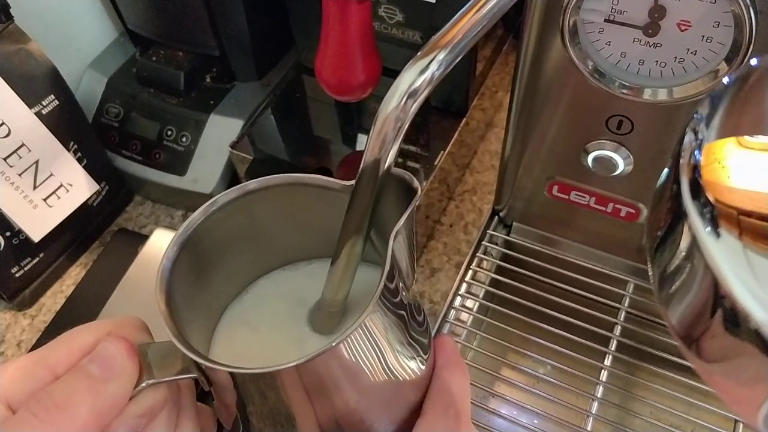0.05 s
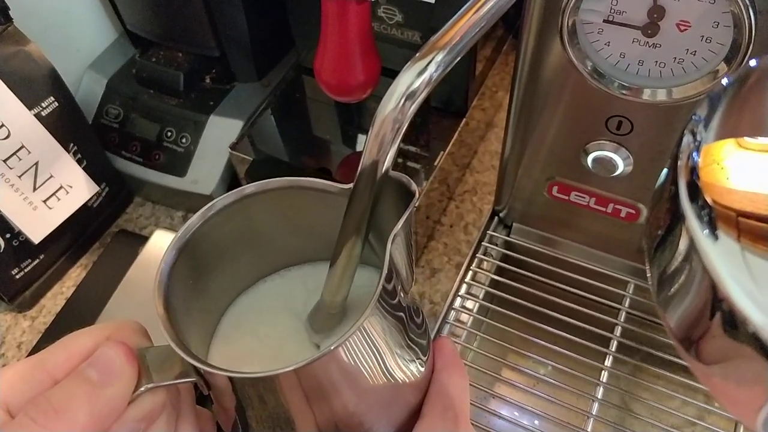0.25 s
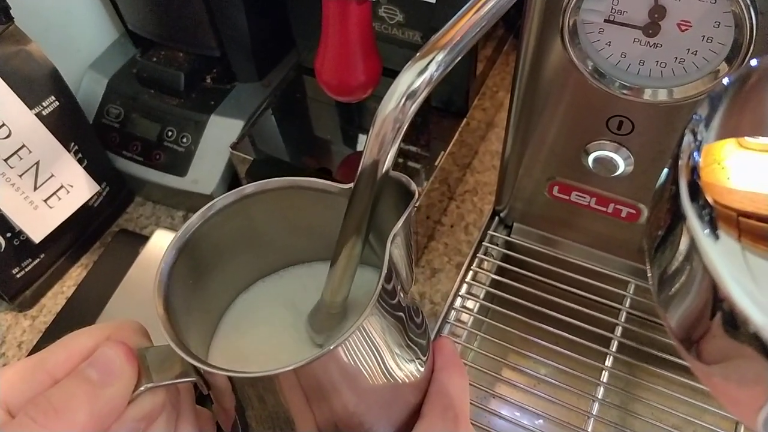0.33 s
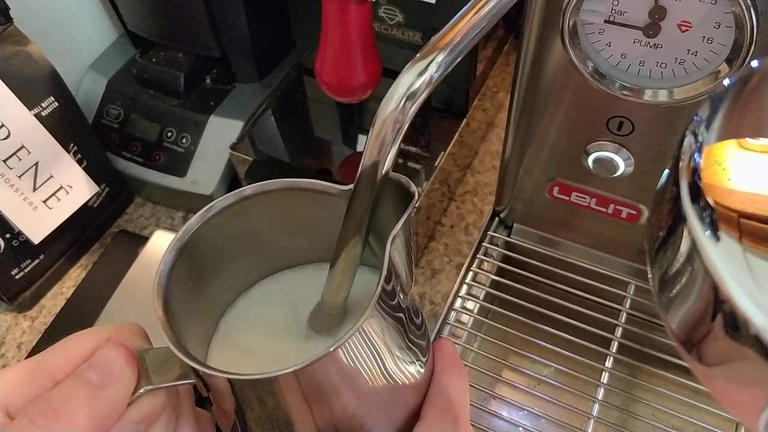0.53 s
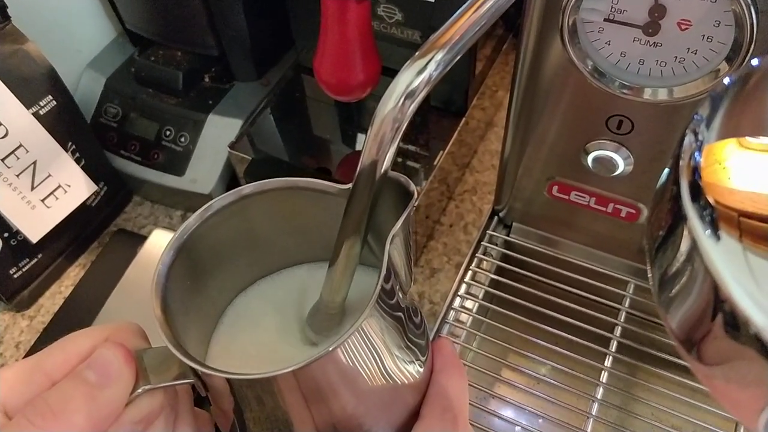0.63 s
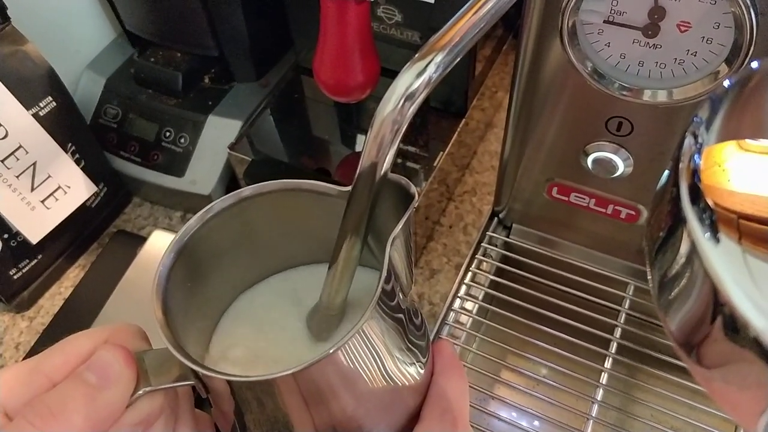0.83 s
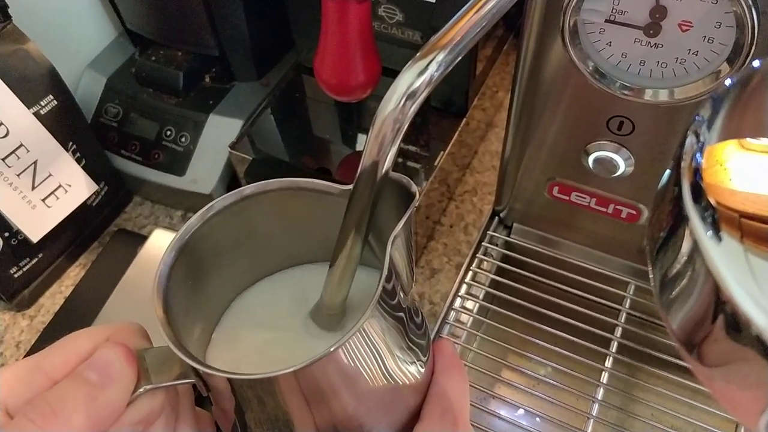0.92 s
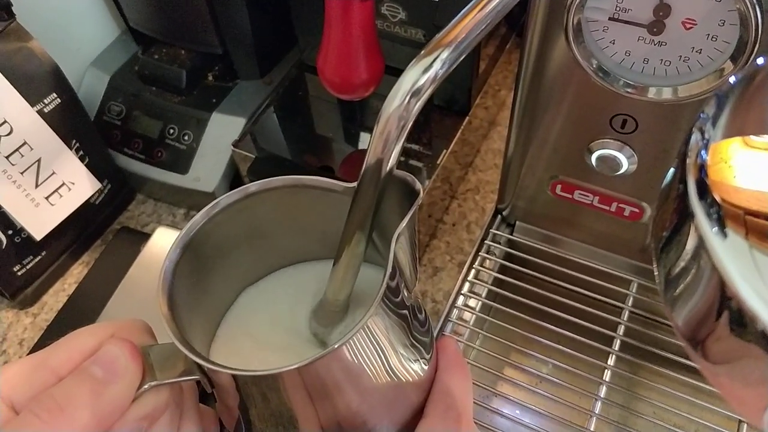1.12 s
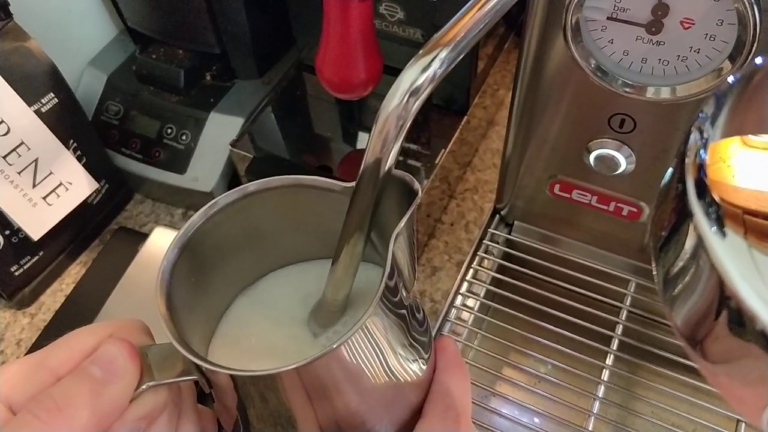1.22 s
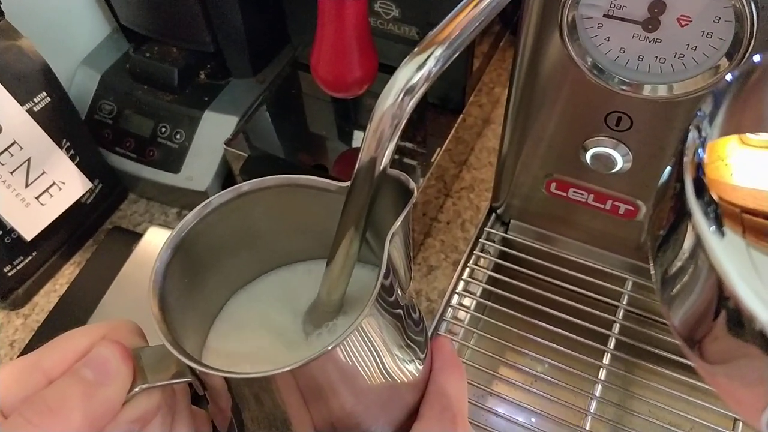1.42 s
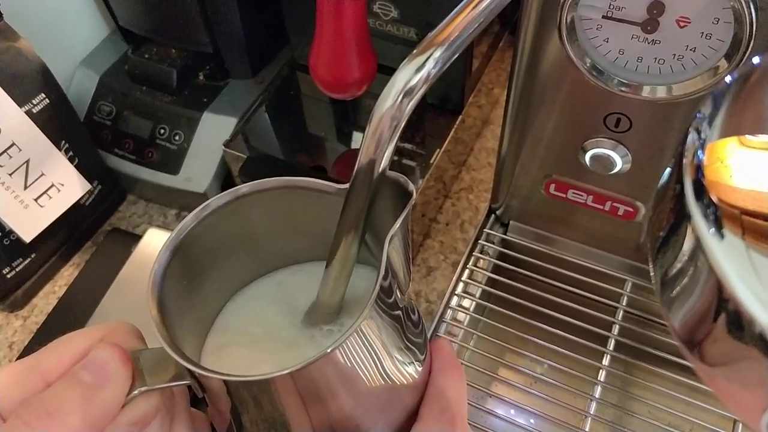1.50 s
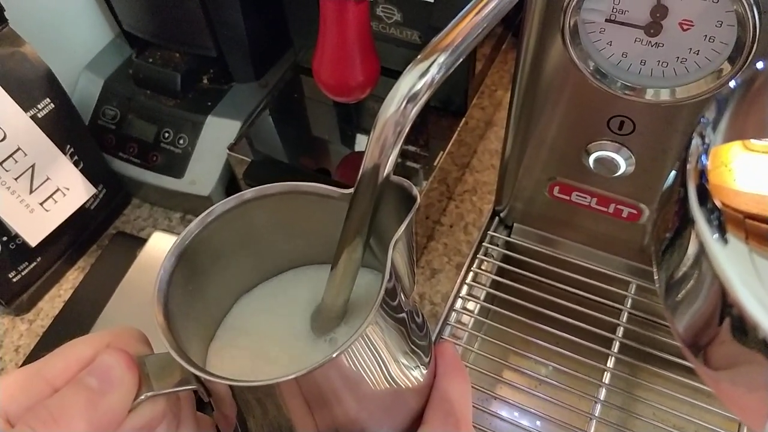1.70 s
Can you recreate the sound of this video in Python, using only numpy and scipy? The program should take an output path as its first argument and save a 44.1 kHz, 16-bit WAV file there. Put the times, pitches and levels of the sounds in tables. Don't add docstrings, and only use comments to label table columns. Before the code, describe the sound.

A steam wand froths milk in a metal pitcher, heard close in a small kitchen over faint low hum. Soft hiss opens; spits and piercing chirps break out at 0.2-0.4 s. The loudest ragged tearing, with ringing pings, comes at 0.55-0.75 s. Quieter churn follows until 1.0 s, then choppy chirps, hollow gulps and spits until 1.45 s, easing into bubbly hiss. Treble is slightly dulled.

```python
import sys
import numpy as np
from scipy import signal
from scipy.fft import rfft, irfft
from scipy.io import wavfile

SR = 44100
rng = np.random.default_rng(int(sys.argv[2]) if len(sys.argv) > 2 else 0)


def dump(signal):
    limited = np.clip(np.atleast_2d(signal).T, -1, 1)
    pcm = np.round(limited * 32767).astype(np.int16)
    wavfile.write(sys.argv[1], SR, pcm)


def amplitude_ratio(level_db):
    exponent = np.asarray(level_db, float) / 20
    return 10 ** exponent


N = 77175


def rms_one(x):
    return x / np.sqrt(np.mean(x ** 2) + 1e-20)


def drift(rate_hz):
    r = np.exp(-2 * np.pi * rate_hz / SR)
    noise = rng.standard_normal(N + SR)
    return rms_one(signal.lfilter([1], [1, -2 * r, r * r], noise)[SR:])


def coloured(points):
    hz, db = np.transpose(points)
    grid_hz = np.arange(N // 2 + 1) * SR / N + 1
    gain = amplitude_ratio(np.interp(np.log(grid_hz), np.log(hz), db))
    return rms_one(irfft(rfft(rng.standard_normal(N)) * gain, N))


def time_from(start_s):
    return np.arange(N)[:, None] / SR - start_s


def power_sum(shapes):
    return np.sqrt(np.sum(shapes ** 2, axis=1))


def blips(t, db, length_s):
    rise_share = 0.25
    rise = np.minimum(t, 0) / (rise_share * length_s)
    fall = np.maximum(t, 0) / ((1 - rise_share) * length_s)
    return amplitude_ratio(db - 3.47 * rise ** 2 - 11.3 * fall ** 0.69)


# frequency in Hz, width in Hz, level in dB.
PITCHER = [(1010, 149, 7), (1133, 102, 1), (1801, 69, 3.5), (2487, 227, -0.5), (2828, 84, 1),
           (3383, 53, 1.5), (3712, 56, 6), (4274, 70, 6.5), (4460, 140, 8.5), (4790, 160, 9.5),
           (5468, 150, 12), (5374, 68, 4.5), (6804, 250, 5.5), (7300, 380, 8.5)]


def pitcher(x, shift_db=0):
    direct_db, foam_rate_hz = -4, 21.5
    out = amplitude_ratio(direct_db) * x
    for hz, width_hz, db in PITCHER:
        r = np.exp(-np.pi * width_hz / SR)
        poles = [1, -2 * r * np.cos(2 * np.pi * hz / SR), r * r]
        fed = x * amplitude_ratio(shift_db * drift(foam_rate_hz)) if shift_db else x
        out = out + amplitude_ratio(db) * (1 - r * r) / 2 * signal.lfilter([1, 0, -1], poles, fed)
    return out


def sounding(colour, envelope, shift_db=0):
    noise = coloured(colour)
    return pitcher(noise * envelope, shift_db) / np.std(pitcher(noise))


# frequency in Hz, level in dB rms.
HUM = [(58, -55.5), (53.7, -73.5)]
# frequency in Hz, level in dB.
RUMBLE = [(20, -7.5), (80, -11), (130, -9.5), (200, -19), (700, -59)]


def machine():
    waver_db, rumble_db = 1.5, -58.5
    t = np.arange(N) / SR
    out = amplitude_ratio(rumble_db) * coloured([*RUMBLE, (900, -84.0)])
    for hz, db in HUM:
        out = out + np.sqrt(2) * amplitude_ratio(db + waver_db * drift(3)) * np.sin(2 * np.pi * hz * t)
    return out


# time in seconds, hiss level in dB, milk churn level in dB.
JET = [(0, -43, -55), (.15, -44, -69), (.3, -41.5, -62), (.52, -43.5, -66.5), (.8, -42, -61),
       (0.932, -47, -48), (1.03, -50, -49.5), (1.12, -42.5, -39), (1.25, -47, -41), (1.328, -38, -41),
       (1.44, -47.5, -39.5), (1.55, -44, -44), (1.619, -45.5, -51.5), (1.75, -55.5, -45.5)]
# frequency in Hz, level in dB per Hz.
JET_COLOUR = [(300, -13.5), (1000, -6), (2000, -11), (3000, -1.5), (4500, -2.5), (5500, -1.5), (7000, -9.5),
              (8300, -29)]
CHURN_COLOUR = [(300, -11.5), (1000, -5.5), (1900, -15.5), (2800, -5), (3800, -8.5), (5000, -14),
                (8000, -38.5)]
# frequency in Hz, level in dB.
GURGLE_COLOUR = [(60, -12.5), (130, 1), (200, -6), (500, -3.5), (900, -27)]


def jet():
    hiss_trim_db, hiss_patchy_db = -1, 1.8
    churn_trim_db, churn_patchy_db, foam_shift_db = -2, 2.0, 3.5
    crackles_per_s, crackle_db = 620, -5.5
    gurgle_db, gurgle_follows, gurgle_lumpy_db = -60, 0.4, 1.2
    s, hiss_db, churn_db = np.transpose(JET)
    t = np.arange(N) / SR
    stir_db = np.interp(t, s, churn_db)

    hiss = amplitude_ratio(np.interp(t, s, hiss_db) + hiss_trim_db + hiss_patchy_db * drift(30))
    churn = amplitude_ratio(stir_db + churn_trim_db + churn_patchy_db * drift(57))

    size_db = 5 * np.minimum(rng.exponential(1, N), 4)
    clicks = (rng.random(N) < crackles_per_s / SR) * amplitude_ratio(size_db)
    crackle = rms_one(signal.lfilter([1], [1, -.97], clicks))
    churn = churn * (1 + amplitude_ratio(crackle_db) * crackle)

    follow_db = gurgle_follows * (stir_db - stir_db.mean())
    gurgle = amplitude_ratio(gurgle_db + follow_db + gurgle_lumpy_db * drift(27)) * coloured(GURGLE_COLOUR)
    heard_hiss = sounding(JET_COLOUR, hiss, foam_shift_db / 2)
    return heard_hiss + sounding(CHURN_COLOUR, churn, foam_shift_db) + gurgle


def bursts(s, db, hold_s):
    attack_s, t60_s = 0.0076, 0.081
    t = time_from(s) + attack_s / 2
    dying_s = np.clip(t - attack_s - hold_s, 0, 1)
    return power_sum(np.clip(t / attack_s, 0, 1) ** 2 * amplitude_ratio(db - 60 * dying_s / t60_s))


# start in seconds, level in dB, hold in seconds, brightness in dB.
TEARS = [(0.112, -36.5, 0.0054, -13), (0.626, -35, .005, 0), (0.205, -35.5, 0.014, -34),
         (0.238, -26, 0.011, -1.5), (0.251, -39, 0.0032, 5), (0.293, -44.5, .015, -27),
         (0.319, -29.5, 0.012, 2.5), (0.355, -35, 0.01, -2.5), (0.374, -31.5, 0.013, -1.5),
         (0.395, -32, 0.01, 0.5), (0.151, -37, 0.015, -30), (0.557, -30, 0.035, 1.5),
         (0.636, -19, 0.049, -5), (0.666, -18.5, 0.0096, -9), (0.69, -21, 0.011, -1.5),
         (0.705, -17, 0.012, -2.5), (0.725, -26.5, 0.021, -3.5), (0.803, -51.5, 0.0069, -0.5),
         (1.044, -44.5, 0.0059, 10.5), (1.097, -29.5, 0.02, 9), (1.132, -46, 0.0084, 15),
         (1.147, -27.5, 0.0068, 7), (1.167, -35.5, 0.019, 1.5), (1.262, -36.5, 0.0081, -29.5),
         (1.279, -30, 0.0025, -35.5), (1.376, -24.5, 0.0046, 4), (1.402, -24.5, 0.0038, -5),
         (1.42, -34.5, 0.014, 1), (1.487, -43, 0.0022, -30.5), (1.524, -55, 0.01, -21.5)]
# frequency in Hz, level in dB per Hz.
TEAR_COLOUR = [(100, -10.5), (500, -16.5), (1000, -10), (2000, -21), (3000, -8), (5000, -6), (7400, -10.5),
               (8400, -16.5)]


def tears():
    bright_hz, trim_db, spit_db = 6450, -2, 0.5
    s, db, hold_s, bright_db = np.transpose(TEARS)
    spit = amplitude_ratio(trim_db + spit_db * drift(130))
    noise = coloured(TEAR_COLOUR)
    body = signal.sosfilt(signal.butter(4, bright_hz, "low", fs=SR, output="sos"), noise)
    top = signal.sosfilt(signal.butter(4, bright_hz, "high", fs=SR, output="sos"), noise)
    drive = body * bursts(s, db, hold_s) + top * bursts(s, db + bright_db, hold_s)
    return pitcher(drive * spit) / np.std(pitcher(noise))


# peak in seconds, level in dB, length in seconds, pitch in Hz.
GULPS = [(0.24, -33, 0.0033, 1020), (0.262, -39, 0.014, 1042), (0.325, -31.5, 0.01, 1027),
         (0.402, -39, 0.01, 937), (0.585, -42.5, 0.037, 997), (0.646, -29, 0.0098, 1040),
         (0.661, -25, 0.0091, 1022), (0.717, -49, 0.0059, 990), (0.731, -30, 0.011, 983),
         (0.9, -42.5, 0.021, 1010), (0.933, -38.5, 0.0074, 1010), (0.983, -41, 0.0051, 810),
         (1.056, -37, 0.008, 980), (1.109, -36.5, 0.022, 1060), (1.124, -33, 0.004, 1062),
         (1.148, -34.5, 0.0048, 1080), (1.175, -38, 0.0086, 1023), (1.195, -30, 0.0076, 1010),
         (1.281, -25.5, 0.0053, 1003), (1.286, -33, 0.0035, 1010), (1.308, -37.5, 0.0042, 1010),
         (1.335, -27, 0.0073, 1005), (1.368, -38, 0.042, 1089), (1.387, -44.5, 0.011, 1025),
         (1.456, -31.5, 0.0073, 995), (1.531, -32.5, 0.0067, 1042), (1.604, -39, 0.015, 1088),
         (1.678, -41, 0.0096, 1018), (1.654, -43.5, 0.03, 1005), (1.723, -45, 0.035, 1010),
         (0.85, -50.5, 0.046, 1030), (0.954, -42.5, 0.014, 1053), (1.437, -38.5, 0.018, 1010)]
# frequency in Hz, level in dB per Hz.
GULP_COLOUR = [(300, -5.5), (600, -22), (1050, -7.5), (1500, -7), (4000, -58.5)]


def gulps():
    trim_db, rise_hz_per_s, froth_db = 1.5, 2000, -8
    s, db, length_s, hz = np.transpose(GULPS)
    t = time_from(s)
    shapes = blips(t, db + trim_db, length_s)
    cycles = t * (hz + rise_hz_per_s * t / 2)
    tones = np.sqrt(2) * np.sum(shapes * np.sin(2 * np.pi * cycles), axis=1)
    return tones + sounding(GULP_COLOUR, amplitude_ratio(froth_db) * power_sum(shapes))


# peak in seconds, level in dB, length in seconds.
CHIRPS = [(0.246, -30, .012), (0.262, -24, .009), (0.326, -18, 0.0071), (0.333, -21, 0.0078),
          (0.362, -31.5, 0.017), (0.384, -29, 0.024), (0.409, -33, 0.011), (0.463, -36.5, 0.014),
          (0.567, -33.5, 0.008), (0.584, -29.5, 0.032), (0.667, -16, 0.016), (0.684, -30, 0.0072),
          (.718, -18.5, .012), (1.053, -30.5, 0.0086), (1.097, -30, 0.005), (1.104, -27.5, 0.024),
          (1.113, -28, 0.007), (1.135, -23, 0.0031), (1.152, -20, 0.0087), (1.158, -22, 0.005),
          (1.192, -36, 0.011), (1.332, -32.5, 0.0052), (1.388, -33.5, 0.0077), (1.408, -38, 0.0093)]


def chirps():
    s, db, length_s = np.transpose(CHIRPS)
    level = power_sum(blips(time_from(s), db, length_s))
    hz = 5454 + 95 * drift(250)
    return np.sqrt(2) * level * np.sin(2 * np.pi * np.cumsum(hz) / SR)


# peak in seconds, level in dB, length in seconds, pitch in Hz.
HEAVES = [(.25, -41, 0.011, 285), (.251, -39.5, 0.012, 591), (0.333, -48.5, 0.02, 270),
          (.594, -46.5, 0.014, 280), (.584, -45, 0.014, 580), (0.59, -49, 0.049, 540),
          (0.68, -38.5, 0.014, 265), (.705, -39.5, 0.017, 260), (.678, -43, 0.015, 440),
          (.725, -46, .02, 440), (0.75, -37.5, 0.018, 870), (0.67, -38, 0.024, 970), (0.9, -41, .006, 200),
          (.984, -42.5, .003, 670), (1.297, -43.5, .03, 127), (1.6, -47.5, 0.017, 180),
          (1.338, -44, 0.0082, 540), (3.2, -49, 0.016, 560), (.255, -51, 0.057, 125),
          (0.719, -45, 0.061, 115.7), (.997, -44.5, 0.0308, 130), (1.2, -51, 0.016, 120),
          (1.4, -48.5, 0.027, 118), (1.055, -45.5, 0.022, 200), (1.61, -42, 0.022, 115),
          (1.73, -48.5, 0.05, 100)]


def heaves():
    s, db, length_s, hz = np.transpose(HEAVES)
    t = time_from(s)
    return np.sqrt(2) * np.sum(blips(t, db, length_s) * np.sin(2 * np.pi * hz * t), axis=1)


# peak in seconds, level in dB, length in seconds, pitch in Hz.
POPS = [(0.651, -32, .01, 4850), (0.672, -18.5, .008, 4900), (0.694, -16.5, .005, 4900),
        (0.7, -17, .006, 4270), (.713, -15.5, 0.014, 4840), (.786, -30, .005, 4800),
        (.573, -36, 0.034, 7480), (1.114, -31.5, 0.014, 7450), (1.156, -31, .008, 7300),
        (.252, -30, .012, 7030), (.395, -32, .025, 7060), (1.177, -37, .006, 4750),
        (1.23, -37.5, 0.044, 3330), (1.236, -35, 0.0055, 4140), (1.25, -30.5, .007, 4270),
        (1.254, -33, 0.0085, 2820), (1.268, -34.5, 0.0091, 2785), (1.291, -26.5, .005, 4710),
        (1.308, -34, 0.0059, 4730), (1.325, -42, 0.013, 2850), (1.336, -35, 0.0068, 3700),
        (1.381, -31, 0.0055, 4350), (1.382, -34.5, 0.0075, 2790), (1.378, -36, 0.004, 7250),
        (1.408, -33, 0.0039, 4460), (1.435, -30.5, 0.017, 7000), (1.443, -39, 0.0089, 2860),
        (1.476, -45, 0.017, 2775), (1.485, -36.5, 0.0067, 4800), (1.495, -32, 0.0049, 4380),
        (1.534, -37, 0.011, 4670), (1.545, -41, 0.013, 4340), (1.557, -40.5, 0.0072, 4500),
        (1.595, -43, 0.011, 4460), (1.616, -43, 0.013, 4230), (1.651, -43.5, .012, 4280),
        (1.686, -47, .012, 4180)]


def pops():
    wander_hz = 160
    s, db, length_s, hz = np.transpose(POPS)
    t = time_from(s)
    wander_cycles = np.cumsum(wander_hz * drift(250))[:, None] / SR
    tones = np.sin(2 * np.pi * (hz * t + wander_cycles))
    return np.sqrt(2) * np.sum(blips(t, db, length_s) * tones, axis=1)


def kitchen(x):
    t60_s, onset_s, level_db = 0.36, 0.0086, -16
    t = np.arange(SR // 2) / SR
    tail = rng.standard_normal(len(t)) * amplitude_ratio(-60 * t / t60_s) * np.clip(t / onset_s, 0, 1)
    tail = tail / np.sqrt(np.sum(tail ** 2))
    return amplitude_ratio(level_db) * signal.fftconvolve(x, tail)[:N]


def scene():
    froth = jet() + tears() + gulps() + chirps() + heaves() + pops()
    return (froth + kitchen(froth) + machine())[None]


def low_pass(x):
    return signal.sosfilt(signal.butter(12, 8950, fs=SR, output="sos"), x)


def record(dry):
    cutoff_hz = 9057
    cut = signal.sosfilt(signal.cheby2(16, 75, cutoff_hz, fs=SR, output="sos"), dry)
    return low_pass(cut)


dry = scene()
out = record(dry)
dump(out)
```